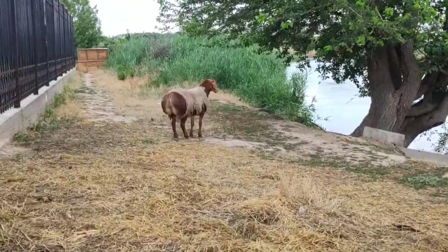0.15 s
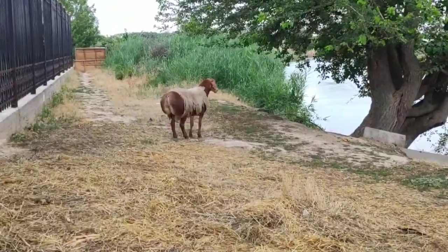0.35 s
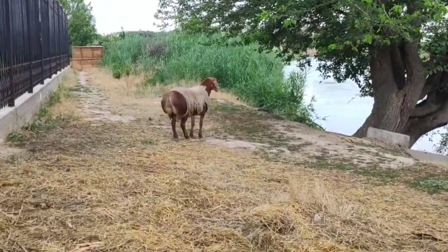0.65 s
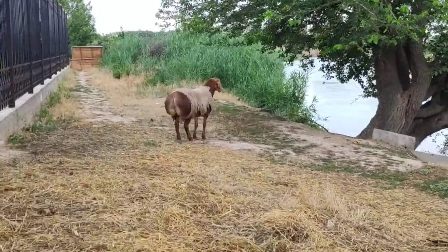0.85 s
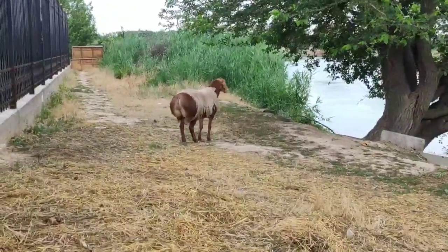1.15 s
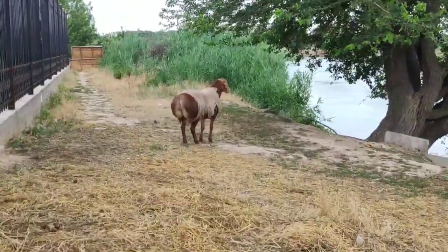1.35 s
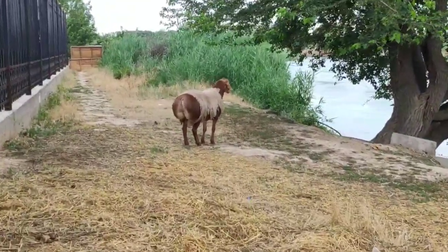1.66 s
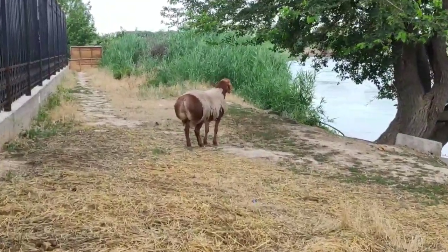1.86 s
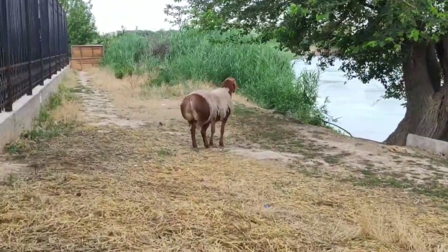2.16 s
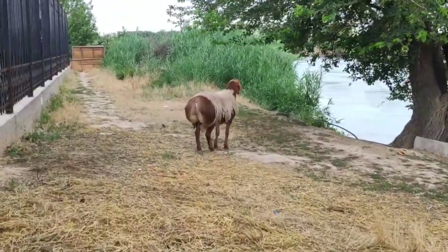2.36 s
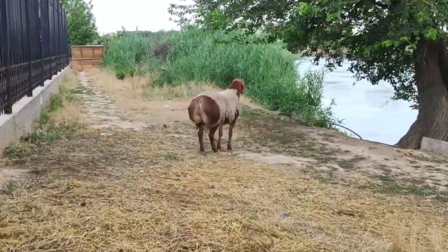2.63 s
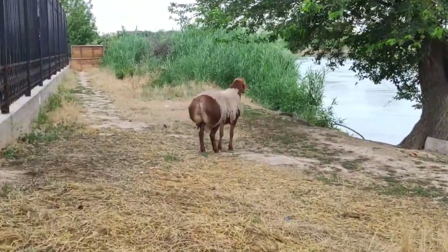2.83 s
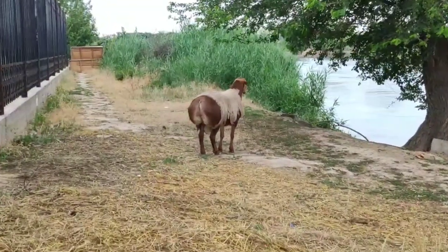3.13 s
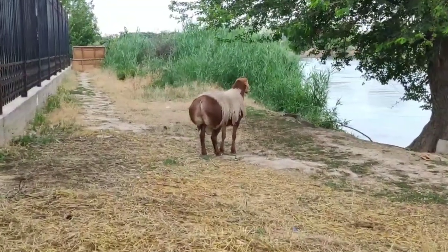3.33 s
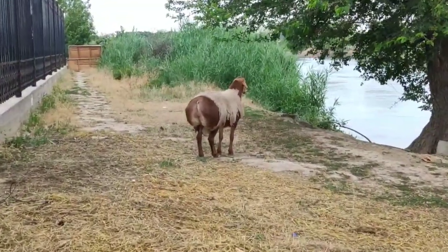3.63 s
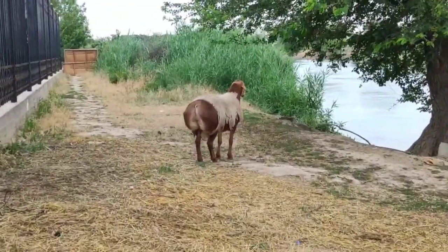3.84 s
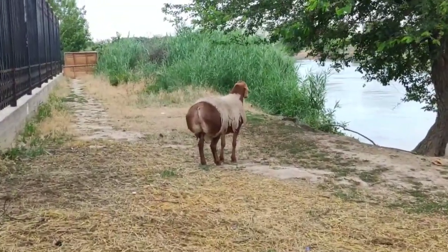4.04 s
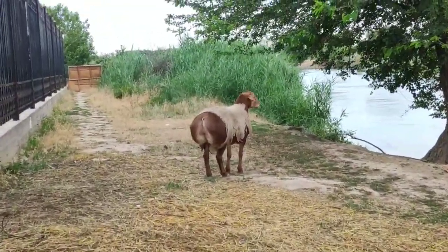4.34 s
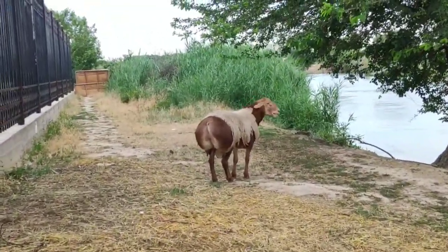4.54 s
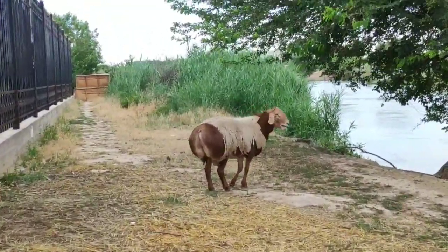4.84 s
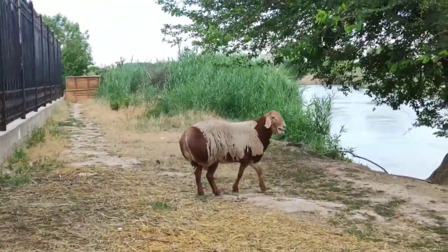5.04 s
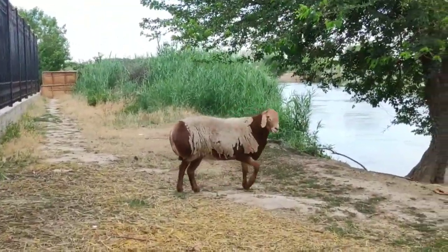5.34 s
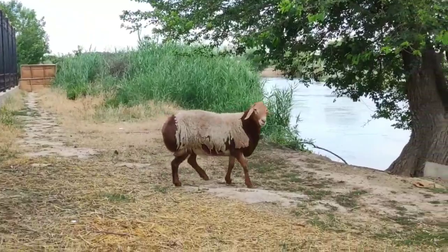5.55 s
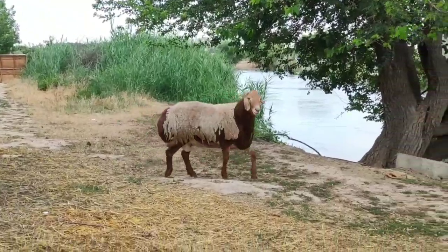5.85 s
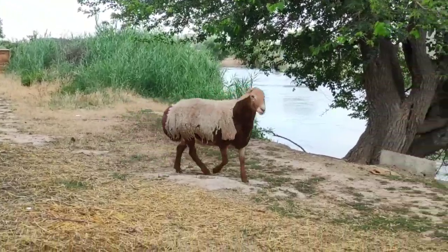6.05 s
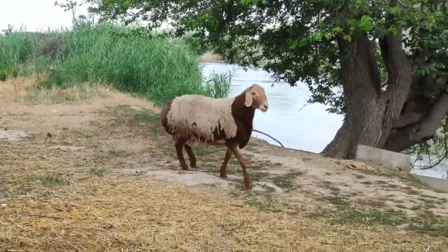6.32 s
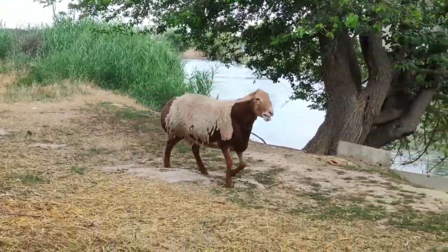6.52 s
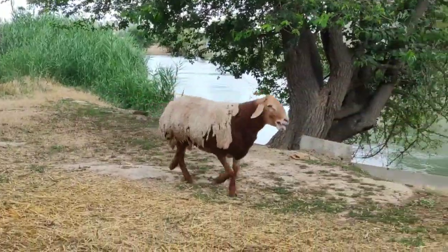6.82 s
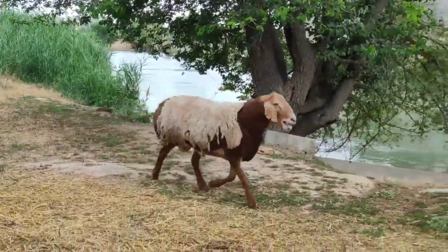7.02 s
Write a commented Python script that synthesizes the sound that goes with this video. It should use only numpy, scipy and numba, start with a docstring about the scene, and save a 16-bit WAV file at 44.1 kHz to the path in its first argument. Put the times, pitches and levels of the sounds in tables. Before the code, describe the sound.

A faint, deep rumble and wind run throughout this outdoor scene. From the start, dry straw rustles close to the microphone in short, crisp bursts, mostly on the left, with sharp little snaps. Dull knocks on the microphone come now and then, around 0.7, 1.3 and 3.1 seconds among others. From about 1.5 seconds a bird further off sings short, scratchy, gliding notes, busiest until 3.5 seconds, with scattered notes up to 6.4. The straw is loudest between 3.7 and 4.6 seconds, with many snaps, and grows much quieter after about 5.5. A ram bleats hoarsely from roughly 4.6 to 5.1 seconds, low and breathy, its pitch rising and falling. A second, nearer and rougher bleat follows from about 6.5 to 7.1 seconds. The ram and the bird both have a brief echo.

```python
"""Dry straw rustles close to the microphone, in bursts and snaps, mostly on the left, with a few dull knocks.
A reed bird further off sings scratchy notes, each a gliding whistle torn up by a fast flutter.
Then a ram bleats hoarsely twice: uneven vocal-fold pulses and breath ring in its mouth.
Both animals echo briefly on the dry river bank; distant rumble and wind lie under it all."""
import sys
import numpy as np
from scipy import signal
from scipy.io import wavfile
from numba import njit

SR = 44100
rng = np.random.default_rng(int(sys.argv[2]) if len(sys.argv) > 2 else 0)


def dump(signal):
    """Clip the signal to [-1, 1] and save it as 16-bit WAV at the path in sys.argv[1]."""
    limited = np.clip(np.atleast_2d(signal).T, -1, 1)
    pcm = np.round(limited * 32767).astype(np.int16)
    wavfile.write(sys.argv[1], SR, pcm)


N = 316638


def amp(db):
    """Turn decibels into a gain to multiply by."""
    return 10 ** (np.asarray(db) / 20)


def rms_one(x):
    """Scale a sound so that its average strength (rms) is 1."""
    return x / np.sqrt(np.mean(x ** 2) + 1e-20)


def in_time(rows):
    """Join rows of (time_s, values...) with straight lines: one curve per value, N samples long."""
    times, *columns = np.transpose(rows)
    return [np.interp(np.arange(N) / SR, times, column) for column in columns]


def at_hz(points, hz):
    """Read between rows of (frequency_hz, value), with octaves evenly spaced."""
    frequencies, values = np.transpose(points)
    return np.interp(np.log(hz), np.log(frequencies), values)


def drift(rate_hz, size=N):
    """A smooth random wobble of size about 1; a higher rate wobbles faster."""
    r = np.exp(-2 * np.pi * rate_hz * 10 / SR)   # worked out at every tenth sample
    slow = signal.lfilter([1], [1, -2 * r, r * r], rng.standard_normal(size // 10 + 4002))[4000:]
    return np.interp(np.arange(size) / 10, np.arange(len(slow)), rms_one(slow))


def panned(x, pan_db):
    """Place a sound between the ears: pan_db is the left level minus the right level."""
    return x * amp(np.array([pan_db / 2, -pan_db / 2]).reshape(2, -1))


def filtered(x, order, hz, kind):
    """Keep a "band" or the "high" part of a sound; a higher order cuts more sharply."""
    return signal.sosfilt(signal.butter(order, hz, kind, fs=SR, output="sos"), x)


@njit
def resonance(x, hz, width_hz):
    """Let a sound ring around a frequency that may move; the gain at the peak is 1."""
    y, r = np.zeros(len(x)), np.exp(-np.pi * width_hz / SR)
    for i in range(2, len(x)):
        push = (1 - r * r) / 2 * (x[i] - x[i - 2])
        y[i] = push + 2 * r * np.cos(2 * np.pi * hz[i] / SR) * y[i - 1] - r * r * y[i - 2]
    return y


def steep_resonance(x, hz, width_hz):
    """Two resonances in a row, so that little gets through away from the peak."""
    centre = np.full(len(x), hz, float)
    return resonance(resonance(x, centre, float(width_hz)), centre, 2. * width_hz)


def shaped_noise(noise, spectrum, flicker_db):
    """Shape two pairs of noises into one stereo sound of rms 1, in bands that each flicker."""
    # how alike the two ears are: frequency_hz, likeness (0 to 1)
    likeness = [(25, 0.6), (60, 0.82), (150, 1), (380, 0.8), (950, 0.41), (2380, 0.045), (5980, 0.016),
                (15000, 0.035)]
    out, edges = 0, 20 * 2 ** np.arange(0, 9.7, .4)
    for k, (low, high) in enumerate(zip(edges, edges[1:])):
        hz = np.sqrt(low * high)
        if spectrum[1][0] * .7 < hz < spectrum[-2][0] * 1.3:
            mid, side = filtered(noise[k % 2], 2, [low, high], "band")
            alike = np.clip(at_hz(likeness, hz), 0, .99)
            gain = amp(at_hz(spectrum, hz) + flicker_db * drift(14))
            out = out + gain * (np.sqrt(1 + alike) * mid + np.sqrt(1 - alike) * side * [[1], [-1]])
    return rms_one(out)


def rumble_and_wind(level_db=-48):
    """Distant rumble and wind: deep, flickering noise with a faint hiss on top."""
    # tone colour of the noise: frequency_hz, relative_db
    colour = [(12, -30), (20, -1), (70, 1.5), (301, -17), (873, -24.5), (949, -29.5), (1860, -31.5),
              (3440, -25), (4060, -50.5), (5230, -27.5), (7310, -20.5), (11100, -52), (13900, -35),
              (16000, -45)]
    return amp(level_db) * shaped_noise(rng.standard_normal((2, 2, N)), colour, flicker_db=2.14)


def crackle(grain_db, clump_db):
    """Countless tiny stalk contacts of uneven size that come in clumps; two pairs of noises."""
    sizes = amp(grain_db * np.minimum(rng.exponential(1, (2, 2, N)), 6))
    return rng.standard_normal((2, 2, N)) * sizes * amp(clump_db * drift(50))


def straw_movement(sag_db=-5, release_s=0.024, steady_sizzle_db=-31, steady_crunch_db=-19.5):
    """Gains of the four straw sounds: bursts rise, weaken and stop on top of a steady rustle."""
    # steady rustle between the bursts: time_s, rustle_db, scuff_db, pan_db
    steady = [(0, -47.5, -55, 9.5), (.7, -48.5, -53, 12.5), (1.4, -50.5, -56, 8.5), (3.2, -48, -54.5, 11),
              (3.6, -50.5, -51.5, 1), (5.45, -49, -54.5, 4), (5.8, -59.5, -56, 3), (6.2, -61.5, -60.5, 0.6),
              (7.18, -62, -56, -2)]
    # bursts of movement: start_s, rise_s, hold_s, rustle_db, sizzle_db, crunch_db, scuff_db, pan_db
    bursts = [(0.107, 0.036, 0.078, -60, -7, -19, -73, 7), (0.32, 0.056, 0.096, -43.5, -10, -16, -56, 8),
              (0.87, 0.022, 0.52, -45.5, -16, -26, -80, 10), (1.08, 0.096, 0.18, -40, -10, -18, -52, 4.5),
              (1.23, 0.037, 0.13, -56, -13.5, -19, -45.5, 7.5), (1.5, 0.12, .12, -51, -15, -23, -52, 7.5),
              (1.823, 0.04, 0.11, -38.5, -1, -20, -51, 7.5), (2.1, 0.028, 0.25, -48, -6, -18, -53, 7),
              (2.438, .1, 0.11, -36.5, -9, -18, -56, 6.5), (2.678, 0.057, 0.28, -43.5, -17, -18, -53, 5),
              (3.055, 0.065, 0.044, -41, -20, -16, -58, 6), (3.673, 0.085, .19, -34, -7, -15, -44.5, 4.5),
              (3.94, 0.056, 0.7, -38, -5, -12.5, -51.5, 3), (4.31, 0.032, 0.063, -35.5, -6, -6, -39.5, -1),
              (4.375, 0.047, 0.06, -23, -8.5, -5.5, -36.5, -3),
              (4.498, 0.017, 0.22, -39, -11, -1.5, -43.5, -3), (4.73, 0.038, 0.314, -43, -9, -21, -45, 5),
              (5.198, 0.046, .16, -38, -6, -15, -48, 3), (5.88, 0.043, 0.09, -53.5, -6, -2, -62, -3),
              (6.25, 0.058, 0.036, -53, -7, -8, -59, 0), (6.398, .06, 0.6, -56, -8, -17, -55, 2.5)]
    steady_db, steady_scuff_db, steady_pan_db = in_time(steady)
    # noises add as powers (gain squared); sizzle and crunch levels are relative to the rustle
    rustle = panned(amp(steady_db), steady_pan_db) ** 2
    sizzle, crunch = rustle * amp(steady_sizzle_db) ** 2, rustle * amp(steady_crunch_db) ** 2
    scuff = amp(steady_scuff_db) ** 2
    for start_s, rise_s, hold_s, rustle_db, sizzle_db, crunch_db, scuff_db, pan_db in bursts:
        length_s = rise_s + hold_s + release_s
        t = np.arange(int(length_s * SR)) / SR
        span = slice(int(start_s * SR), int(start_s * SR) + len(t))
        power = np.interp(t, [0, rise_s, rise_s + hold_s, length_s], [0, 1, amp(sag_db), 0]) ** 2
        burst = panned(amp(rustle_db), pan_db) ** 2 * power
        rustle[:, span] += burst
        sizzle[:, span] += burst * amp(sizzle_db) ** 2
        crunch[:, span] += burst * amp(crunch_db) ** 2
        scuff[span] += amp(scuff_db) ** 2 * power
    return np.sqrt(rustle), np.sqrt(sizzle), np.sqrt(crunch), np.sqrt(scuff)


def straw():
    """Stalks rustle, with a high sizzle and a lower crunch; the ground scuffs dully underneath."""
    # tone colours of the stalks and of the ground: frequency_hz, relative_db
    rustle_colour = [(1760, -11.5), (3000, -15), (3810, -30), (5480, 2), (6030, -52), (7220, -1),
                     (7660, 0.5), (8630, -27), (9790, -6.5), (11000, -13), (12500, -6), (16200, -49),
                     (22000, -120)]
    scuff_colour = [(210, -29), (350, -5.5), (996, 1), (1140, 1), (1880, -0.5), (2100, 5), (2370, -5.5),
                    (5000, 2), (6500, -1), (11000, -120)]
    rustle_gain, sizzle_gain, crunch_gain, scuff_gain = straw_movement()
    stalks = crackle(grain_db=4, clump_db=1)
    sizzle = sizzle_gain * rms_one(filtered(stalks[0, ::-1], 4, 12000, "high"))
    crunch = crunch_gain * rms_one(filtered(stalks[1, ::-1], 4, [5000, 6900], "band"))
    rustle = rustle_gain * shaped_noise(stalks, rustle_colour, flicker_db=1.8)
    ground = crackle(grain_db=-1, clump_db=1.5)
    scuff = scuff_gain * shaped_noise(ground, scuff_colour, flicker_db=3)
    return rustle + sizzle + crunch + panned(scuff, 0.66)


def straw_snaps(ring_s=0.00015, splinter_s=0.0028):
    """A snapping stalk rings brightly for a few cycles and leaves a short splintering tail."""
    # snapping stalks: start_s, peak_db, ring_hz, pan_db
    snaps = [(0.7943, -26.5, 7700, 7.5), (1.733, -25, 8450, 10), (2.0047, -17, 8300, 9.5),
             (2.315, -22, 8300, 15), (2.7885, -27, 8260, 11), (3.1334, -17.5, 7600, 9),
             (3.691, -21.5, 7800, 3.5), (3.8043, -19, 11300, -9), (3.8301, -11.5, 8250, -8),
             (3.9958, -18, 9500, 15), (4.0058, -19, 8340, -15), (4.0641, -9.5, 7950, 14),
             (4.104, -20, 9800, 10), (4.1136, -15, 9500, 0), (4.2628, -11, 9050, -6),
             (4.3198, -14, 9340, 10), (4.371, -19.5, 6600, 6), (4.4104, -9.5, 6940, -10),
             (4.5335, -8.5, 8900, 5), (4.562, -16.5, 7200, -7), (4.6865, -21, 9900, 17),
             (4.6952, -20, 7950, -17), (5.0795, -22, 8350, 11), (5.3657, -12.5, 9600, 9.5),
             (5.474, -12.5, 8800, 4), (5.567, -26.5, 8700, 24), (5.7706, -18, 7100, 26.5),
             (5.8271, -28, 4770, 18), (5.9505, -30.5, 7260, 18), (5.9679, -26.5, 9300, 32.5),
             (6.011, -25.5, 7400, 21), (6.2497, -36, 5740, 18), (6.2667, -28.5, 8040, 27)]
    out, t = np.zeros((2, N)), np.arange(500) / SR
    for start_s, peak_db, hz, pan_db in snaps:
        ring = np.sin(2 * np.pi * hz * t) * np.exp(-t / ring_s) * np.minimum(t * hz, 1)
        splinters = 0.047 * rng.standard_normal((2, len(t))) * np.exp(-t / splinter_s)
        snap, at = ring + splinters, round(start_s * SR)
        out[:, at:at + len(t)] += panned(amp(peak_db) * snap / np.abs(snap).max(), pan_db)
    return out


def microphone_knocks():
    """A knock pushes the microphone's thin membrane in, and the swing quickly dies away."""
    # dull bumps on the microphone body: start_s, peak_db, ring_hz, fade_cycles, pan_db
    knocks = [(0.7369, -25.5, 1090, 0.84, 1), (0.7562, -34, 1050, 0.76, 0), (1.318, -24, 2060, 0.72, 3),
              (1.34, -26, 1950, 0.6, 6), (1.35, -34, 1300, 0.7, -6), (1.367, -32, 1600, 0.96, 3),
              (1.392, -30, 1400, 0.51, 3), (1.405, -29.5, 1230, 1.1, -1), (2.804, -37, 2240, 1.6, 3),
              (3.131, -20, 2300, 0.58, -1), (3.885, -26.5, 1100, 1.1, -4), (4.062, -34, 119, 0.29, -21.5),
              (4.33, -33, 136, 0.086, 22), (4.37, -36.5, 89, 0.25, 15), (4.462, -33, 156, 1.4, 2),
              (5.263, -35, 1520, 4.5, 13), (4.593, -31, 93, 0.13, 25), (5.475, -35, 1230, 1.4, 2),
              (5.6995, -35.5, 554, 0.44, 25.5), (5.7713, -37, 1500, 0.19, 19), (5.78, -37.5, 670, 0.16, 27),
              (5.967, -41, 900, 0.31, 23), (5.992, -39, 494, 0.37, 29), (6.012, -25.5, 1670, 0.043, 30),
              (6.2666, -29, 980, 0.082, 28.5), (6.4, -42, 790, 0.31, 25)]
    out = np.zeros((2, N))
    for start_s, peak_db, hz, fade_cycles, pan_db in knocks:
        cycles = np.arange(int(6 * fade_cycles / hz * SR)) * hz / SR
        swing = -np.sin(2 * np.pi * cycles) * np.exp(-cycles / fade_cycles) * np.minimum(4 * cycles, 1)
        at = round(start_s * SR)
        out[:, at:at + len(swing)] += panned(amp(peak_db) * swing / np.abs(swing).max(), pan_db)
    return out


def with_echoes(x):
    """Echoes reach the two ears a little apart; deep sounds pass the obstacles without an echo."""
    # echoes from ground, wall and trees: delay_s, level_db
    echoes = [(.0013, -14.5), (.0041, -4.5), (.011, -6.5), (.023, -7.5), (.047, -9.5)]
    treble, out = filtered(x, 2, 900, "high"), x.copy()
    for k, (delay_s, level_db) in enumerate(echoes):
        for side in range(2):
            lag = int(delay_s * SR * (1.3 if (k + side) % 2 else 1))   # the ears take turns being late
            out[side, lag:] += amp(level_db) * treble[side, :-lag]
    return out


def reed_bird(throb_hz=65, throb_depth=.75, clear_below_hz=160):
    """Each note is a gliding whistle that throbs evenly and is torn up by a fast random flutter."""
    # notes of the song: start_s, length_s, start_hz, end_hz, level_db, flutter_hz
    notes = [(1.519, 0.05, 3570, 3310, -46, 60), (1.538, 0.027, 3660, 4730, -61, 100),
             (1.571, 0.029, 2670, 2370, -51, 200), (1.683, 0.1, 3700, 3110, -52, 100),
             (1.736, 0.19, 2846, 2620, -45, 150), (2.034, 0.023, 4170, 4020, -49, 100),
             (2.11, 0.053, 3590, 3560, -51.5, 150), (2.29, 0.1, 3550, 3360, -57.5, 149),
             (2.361, .19, 2594, 2650, -50, 180), (2.787, 0.044, 3570, 3480, -48, 100),
             (2.841, 0.04, 2950, 2420, -47, 200), (2.854, 0.047, 1590, 1660, -51, 100),
             (3.081, 0.048, 3600, 2990, -43, 253), (3.12, 0.044, 2760, 2305, -41.5, 250),
             (3.28, 0.027, 4600, 3840, -46, 350), (3.292, 0.045, 3930, 3790, -45.5, 152),
             (3.317, 0.04, 3840, 3350, -49.5, 100), (3.38, 0.175, 2454, 2590, -42.5, 71),
             (3.494, .16, 2650, 2657, -59, 40.3), (3.382, 0.041, 4740, 4900, -46.5, 200),
             (3.514, 0.03, 4710, 3760, -44, 150), (4.144, 0.055, 2600, 2746, -43, 220),
             (5.379, 0.017, 3010, 2860, -45, 150), (5.396, 0.033, 2800, 2240, -41.5, 150),
             (5.668, 0.022, 2830, 2140, -49.5, 150), (5.882, 0.063, 4430, 3850, -51.5, 300),
             (6.385, 0.062, 4950, 3560, -53.5, 250)]
    out = np.zeros(N)
    for start_s, length_s, start_hz, end_hz, level_db, flutter_hz in notes:
        size, at = int(length_s * SR), int(start_s * SR)
        whistle = np.sin(2 * np.pi * np.cumsum(np.linspace(start_hz, end_hz, size)) / SR)
        clear = np.exp(-flutter_hz / clear_below_hz)   # a slower flutter leaves more pure tone
        scratch = clear + (1 - clear) * drift(flutter_hz, SR // 4)[:size]
        throb = 1 + throb_depth * np.sin(2 * np.pi * throb_hz * np.arange(size) / SR)
        out[at:at + size] += amp(level_db) * scratch * throb * whistle * signal.windows.tukey(size, .5)
    return out


def vocal_folds(pitch_hz, rough):
    """Uneven pulses, each with a puff of breath: gives the cycle count, a buzzy and an airy sound."""
    size = len(pitch_hz)
    cycles = np.cumsum(pitch_hz * (1 + .07 * rough * drift(60, size))) / SR
    count = cycles.astype(int)
    force = np.clip(rng.standard_normal(count[-1] + 1), -2, 1.5)   # each cycle closes with its own force
    strength = amp(4.3 * rough * force[count])
    pulses = np.sqrt(1 - rough) * rms_one(np.diff(count, prepend=0).astype(float))
    breath = rms_one(rng.standard_normal(size) * np.exp(-2.5 * (cycles % 1)))
    thin_breath = signal.lfilter([1, -1], [1, -.975], breath)   # swirling air is weak in the bass
    buzzy = strength * (pulses + np.sqrt(rough) * thin_breath)
    airy = strength * (0.18 * pulses + breath)
    return cycles, buzzy, airy


def bleat(shape, low_resonances, high_resonances, mouth_width_hz, mouth_db, base_tone_db):
    """The vocal folds' buzz rings the low mouth resonances; the high ones ring mostly with breath."""
    # hoarseness of the voice: time_s, roughness (0 to 1)
    hoarseness = [(4.55, .5), (4.65, .35), (4.8, .3), (5.12, .3), (6.47, .75), (6.68, .6), (6.74, .32),
                  (6.85, .45), (6.9, .72), (6.96, .5), (7.16, .62)]
    span = slice(int(shape[0][0] * SR), int(shape[-1][0] * SR))
    pitch_hz, level_db, mouth_hz, treble_db = [curve[span] for curve in in_time(shape)]
    size = len(pitch_hz)
    cycles, buzzy, airy = vocal_folds(pitch_hz, rough=in_time(hoarseness)[0][span])
    low, high = amp(mouth_db) * steep_resonance(buzzy, mouth_hz, mouth_width_hz), 0
    for k, (hz, width_hz, db) in enumerate(low_resonances):   # neighbours swing in opposite directions
        low += amp(db) * (-1) ** k * resonance(buzzy, np.full(size, float(hz)), float(width_hz))
    for k, (hz, width_hz, db, pan_db) in enumerate(high_resonances):
        swell = amp(db + 2.2 * drift(11.3, size))   # each swells and fades on its own
        high += panned(swell * (-1) ** k * steep_resonance(airy, hz, width_hz), pan_db)
    voice = amp(level_db) * (rms_one(low) + amp(treble_db) * rms_one(high))
    # the voice's lowest tone wavers and follows most of the throat's rise and fall in level
    tone_db = base_tone_db + 0.81 * (level_db - level_db.max()) + 2.2 * drift(27, size)
    base_tone = np.sqrt(2) * amp(tone_db) * np.sin(2 * np.pi * cycles)
    out = np.zeros((2, N))
    out[:, span] = (voice + base_tone) * signal.windows.tukey(size, .06)
    return out


def ram():
    """Two hoarse bleats, one away and one near, each rising and falling in pitch."""
    # how throat and mouth move: time_s, pitch_hz, level_db, mouth_resonance_hz, relative_treble_db
    away_shape = [(4.55, 132.6, -43, 1354, -21), (4.63, 137, -38, 1330, -11),
                  (4.69, 148.9, -40.5, 1320, -6), (4.76, 150.3, -40, 1330, -7), (4.8, 148.7, -44, 1290, -2),
                  (4.886, 143.2, -45, 1260, 0.5), (4.984, 131.6, -45, 1140, -0.5),
                  (5.07, 130.3, -46.5, 1210, 0.5), (5.11, 134, -58, 1200, -16)]
    near_shape = [(6.47, 108.5, -59.5, 590, -6.5), (6.6, 110.2, -39.5, 600, -3),
                  (6.67, 115.9, -41, 610, -6), (6.73, 148.4, -35, 617, -5), (6.775, 150.8, -36.5, 576, -7),
                  (6.86, 152.5, -39.5, 603, -4), (6.94, 136.8, -42, 626.7, -2.5),
                  (7.005, 111.1, -36.5, 600, -13), (7.1, 112.3, -42, 600, -3.5),
                  (7.15, 111.8, -59, 583, -5)]
    # low resonances that stay put through a bleat: centre_hz, width_hz, relative_db
    away_low = [(200, 42, -2.5), (334, 130, -0.5), (643, 61, 1), (1010, 480, -9.5)]
    near_low = [(206, 143, -6), (283, 290, -8.5), (487, 93, -3), (933, 104, -15.5), (1410, 140, -11)]
    # high resonances, which reach the two sides unequally: centre_hz, width_hz, relative_db, pan_db
    away_high = [(1870, 310, 2.5, -19), (2106, 260, 9, 5.5), (2950, 470, 4.5, -1), (4800, 550, -23, 4),
                 (6200, 360, -14, -12), (7300, 370, -7, -31)]
    near_high = [(1670, 520, 4, 6), (2130, 260, 7.5, 5), (2500, 1100, 1.5, 3.5), (2935, 320, 0.5, -5),
                 (4420, 240, -2, -9), (6130, 420, -2, -2), (7320, 700, -1.5, -19), (9260, 1100, -3.5, 5),
                 (10100, 3900, -11.5, 5)]
    away = bleat(away_shape, away_low, away_high, mouth_width_hz=115, mouth_db=4, base_tone_db=-44.5)
    near = bleat(near_shape, near_low, near_high, mouth_width_hz=97, mouth_db=-1.1, base_tone_db=-42)
    return away + near


def scene():
    """Ram and bird at a distance, straw close by, rumble all round."""
    bleats = ram()
    background = rumble_and_wind()
    animals = with_echoes(bleats + panned(reed_bird(), 0.051))
    return background + animals + straw() + straw_snaps() + microphone_knocks()


def record(dry):
    """Cut away the very highest treble steeply."""
    cutoff_hz = 16400
    return signal.sosfilt(signal.cheby2(16, 70, cutoff_hz, fs=SR, output="sos"), dry)


dry = scene()
out = record(dry)
dump(out)
```